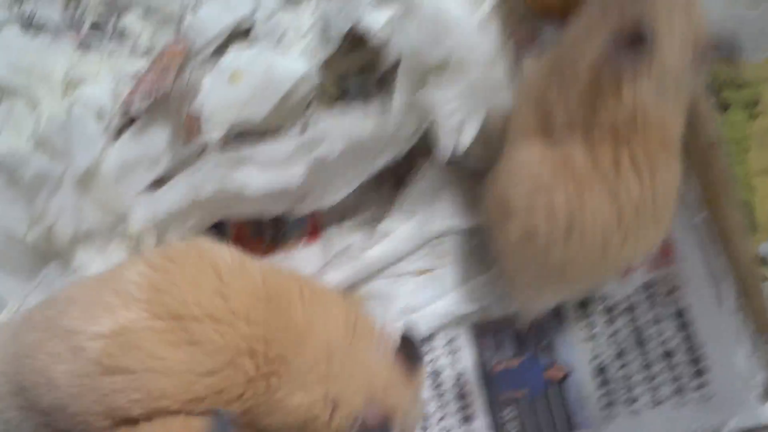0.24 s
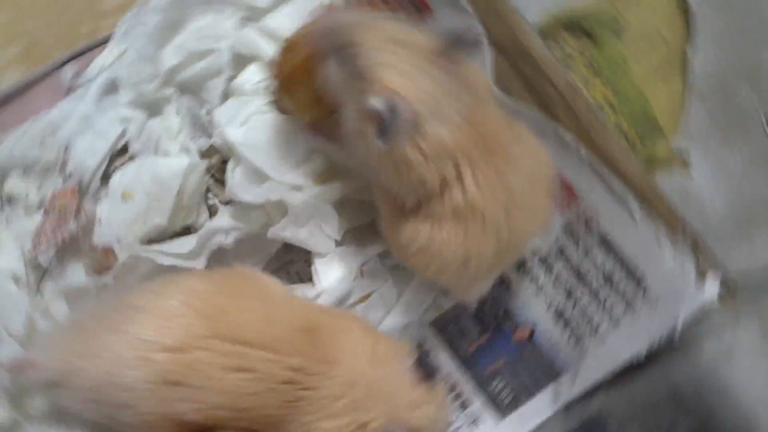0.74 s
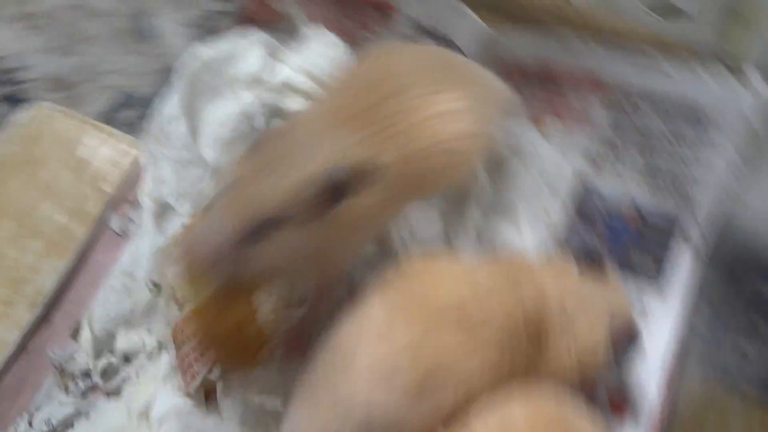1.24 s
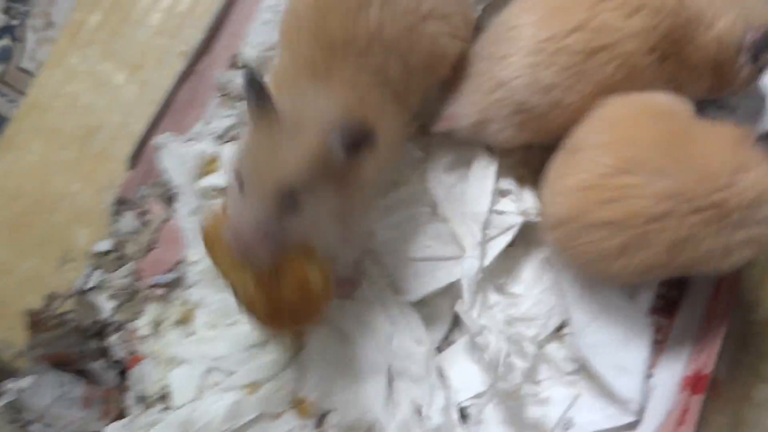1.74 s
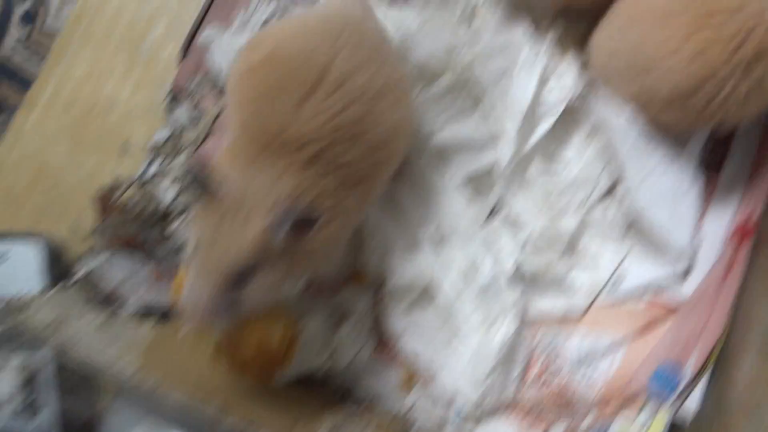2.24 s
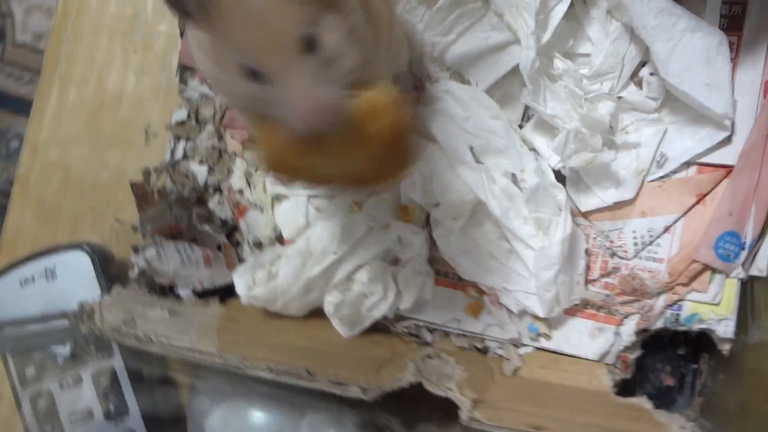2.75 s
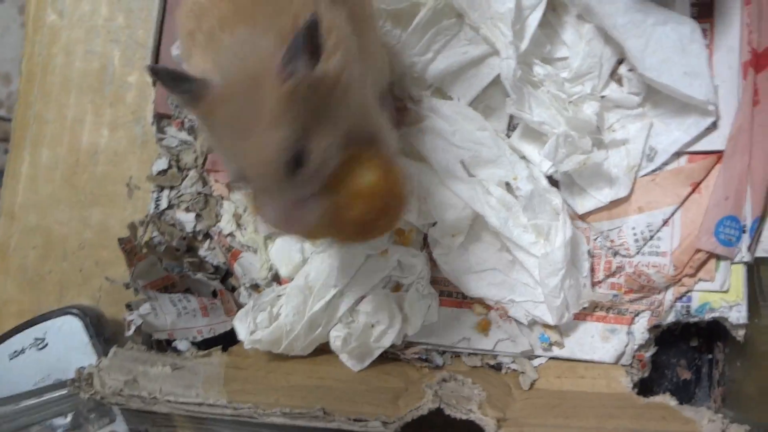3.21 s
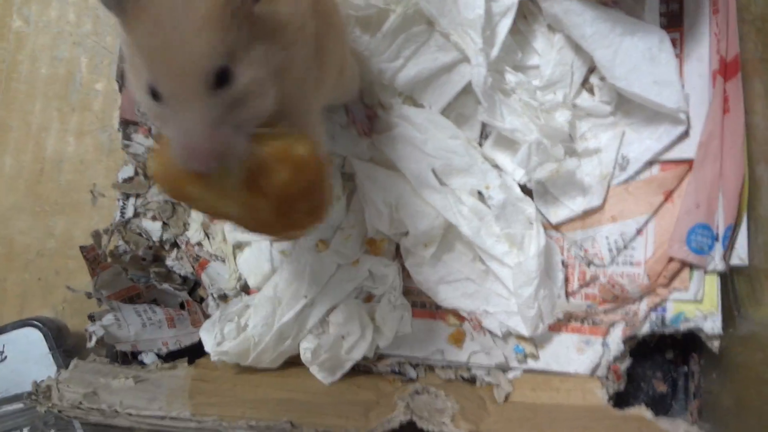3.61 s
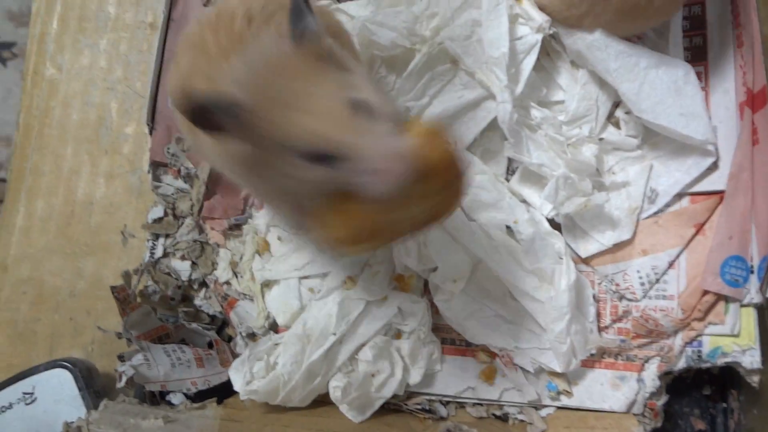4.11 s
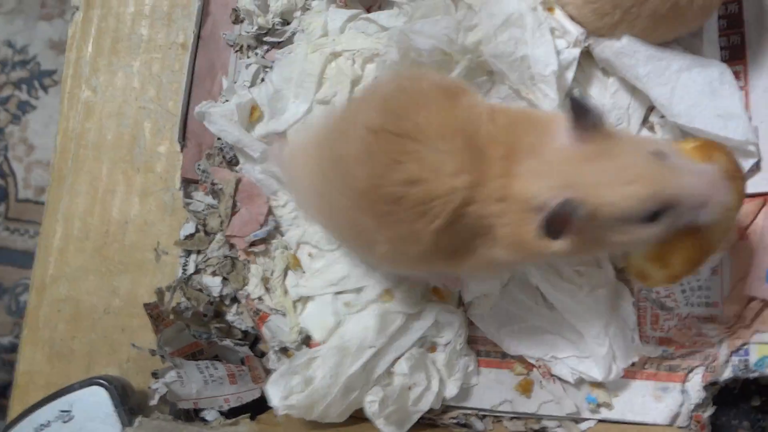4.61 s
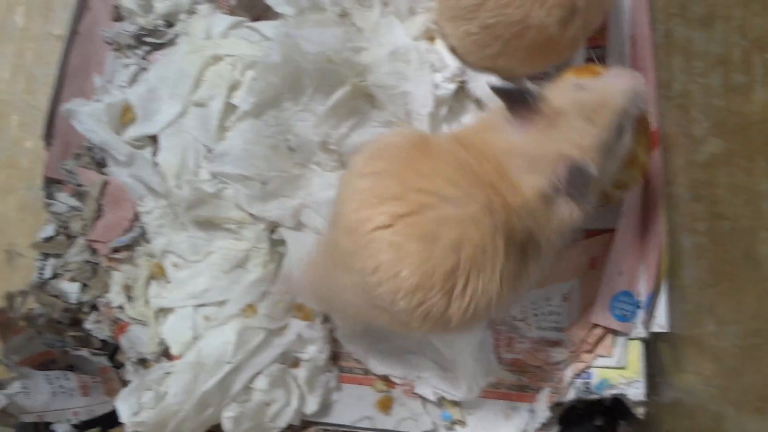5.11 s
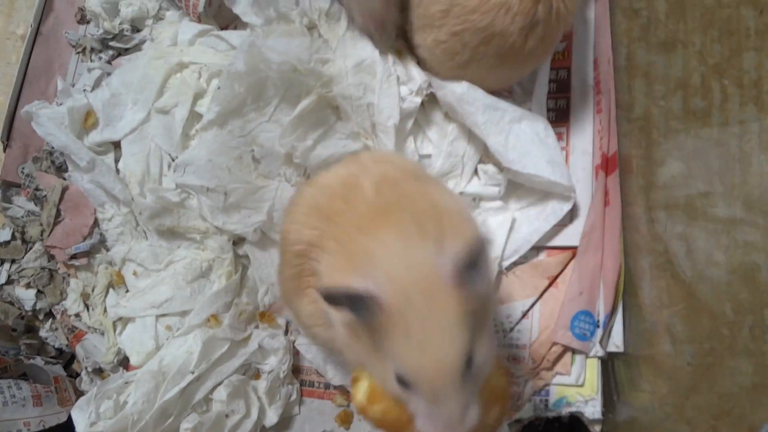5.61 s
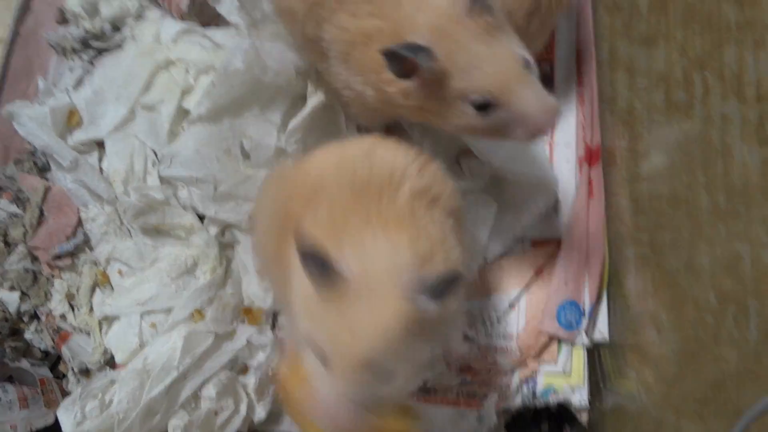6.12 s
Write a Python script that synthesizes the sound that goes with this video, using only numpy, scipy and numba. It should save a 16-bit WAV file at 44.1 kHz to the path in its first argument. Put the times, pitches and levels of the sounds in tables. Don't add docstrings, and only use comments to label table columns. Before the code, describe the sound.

From the start, hamsters scurry close by in crumpled paper: dense dry rustling, with sharp snaps and claw ticks strongest around 0.2 to 0.35 seconds, and soft low paw taps on a hollow wooden floor. Bursts continue near 0.9 and 1.3, then thin out towards 2. At about 2.2 to 2.4 a nut grinds and rolls with a few woody knocks; a tiny sharp tick follows at 2.5. At 2.75 the nut drops: a loud, hollow thump with quick bounces and a brittle rattle, gone by 2.85 except for a low ring. From 3 to 4.2 it is nearly quiet, with faint crinkles and dull steps. Light scurrying returns from 4.3, fuller around 5 to 5.25 with soft low shoves on the board, then scattered rustles until 6.3. Underneath run low rumble, steady hiss, a barely audible high whine and an appliance hum that slowly beats after 2.5. Short, dull room echo.

```python
import sys
import numpy as np
from scipy import signal
from scipy.fft import rfft, irfft, next_fast_len
from scipy.io import wavfile
from scipy.ndimage import uniform_filter1d
from numba import njit

SR = 44100
rng = np.random.default_rng(int(sys.argv[2]) if len(sys.argv) > 2 else 0)


def digitize_waveform(pressure):
    field = np.atleast_2d(pressure).T
    bounded = np.clip(field, -1, 1)
    quanta = np.round(bounded * 32767).astype(np.int16)
    wavfile.write(sys.argv[1], SR, quanta)


def linear_from_db(decibels):
    return 10 ** (np.asarray(decibels, float) / 20)


N = 280343
HUSH = rng.standard_normal(N)

# time in seconds, level in dB.
BUSTLE = [(0.0, -43.5), (0.5, -50), (.9, -49.5), (1.3, -49), (1.65, -51), (1.8, -54), (1.95, -56),
          (2.15, -56.5), (2.7, -59), (3.5, -65), (4.3, -60.5), (4.7, -62), (5.1, -58), (5.4, -63),
          (5.6, -67), (5.9, -59), (6.36, -69)]
# start in seconds, length in seconds, rustle in dB, tissue brightness in dB.
BOUTS = [(0.0, 0.13, -43.5, 2.5), (0.176, 0.013, -45.5, 3.5), (0.218, 0.055, -37.5, -4.5),
         (0.282, 0.045, -39.5, -0.5), (0.373, 0.043, -46, -5), (0.448, 0.018, -49, -3),
         (0.506, 0.059, -48, -4), (0.775, 0.25, -56, 3), (0.87, 0.043, -51.5, -4), (1.075, 0.027, -62, 5.5),
         (1.125, 0.03, -57, 5), (0.908, 0.015, -49, 3.5), (0.955, 0.041, -58, 5), (1.244, 0.063, -51, 6),
         (1.294, 0.032, -41.5, -3), (1.352, 0.097, -46, -0.5), (1.469, 0.076, -50, -1),
         (1.579, 0.045, -46, -4), (1.65, 0.12, -53.5, -3.5), (1.769, 0.091, -48.5, -2.5),
         (1.887, 0.094, -53.5, -2.5), (2.038, 0.44, -52.5, -1.5), (2.363, 0.037, -46, -7.5),
         (2.491, 0.091, -57, 2.5), (2.838, 0.072, -57.5, -2.5), (3.437, .04, -64.5, 8.5),
         (3.497, 0.043, -63, 6), (3.576, 0.12, -75.5, 15.5), (3.276, 0.055, -66, 4.5), (3.11, .04, -69, -1),
         (3.17, .09, -69.5, 1), (3.845, .04, -71, 6), (4.098, 0.21, -66.5, 2.5), (2.607, 0.11, -67, 4),
         (6.213, 0.072, -58.5, -3), (5.97, 0.037, -62, 1), (3.908, 0.081, -65, 12.5),
         (3.991, 0.051, -61.5, 2), (4.345, 0.25, -56.5, -1), (4.493, 0.059, -54.5, 2.5),
         (4.598, 0.021, -56.5, 2.5), (4.642, 0.059, -52.5, -1.5), (4.735, 0.037, -55.5, 1.5),
         (4.805, 0.18, -58.5, 1), (4.999, 0.21, -49.5, 0.5), (5.236, 0.16, -55.5, -4),
         (5.439, .11, -55, -1.5), (5.579, 0.17, -63, 0), (5.755, 0.074, -53, -1.5),
         (5.87, 0.088, -52.5, 0.5), (6.015, 0.057, -57, 3), (6.082, 0.11, -51, -1.5),
         (6.316, .06, -49.5, -5.5)]
# time in seconds, level in dB.
PATTER = [(0.0, -50), (.35, -42.5), (.44, -61), (.53, -51.5), (.7, -54.5), (1.25, -56), (1.32, -48),
          (2.1, -52), (2.32, -39.5), (2.5, -49.5), (3.55, -53.5), (3.92, -53.5), (4.33, -58.5),
          (4.4, -49.5), (4.98, -56.5), (5.15, -44.5), (5.9, -52), (6.1, -57.5)]
# pitch in Hz, level in dB, 60 dB decay in seconds.
BOARD_MODES = [(179, 5.5, 0.058), (195, 10.5, 0.091), (245, 7, 0.14), (279.2, 2, 0.23), (351, -13, 0.07)]
# pitch in Hz, density in dB per Hz.
HISS_COLOUR = [(41, -44), (70, -11.5), (217, -5), (286, -1.5), (362, -29), (555, -12),
               (1360, -27), (3500, -28.5), (7400, -32.5), (10000, -30.5), (11000, -37.5)]

# start in seconds, peak in dB, pitch in Hz, hiss share from 0 to 1.
SNAPS = [(0.1315, -33, 3700, 1), (0.2044, -28.5, 1970, 1), (0.2236, -19, 5800, 1), (0.2385, -14, 3180, 0),
         (0.2607, -26, 3440, 0.4), (0.31, -25.5, 2180, 0.6), (0.321, -35, 1830, 1),
         (0.3398, -24.5, 1720, 1), (0.468, -36, 1800, 0.4), (0.5265, -34, 1860, 1),
         (0.5355, -34, 2370, 0.8), (0.6252, -39.5, 2600, 0.1), (0.7764, -35, 1500, 0.2),
         (0.8053, -39, 6460, 0.5), (0.9175, -26, 3570, 0.9), (0.925, -29, 2400, 0.9),
         (0.9331, -27.5, 2370, 0.2), (1.252, -34, 7570, 0.8), (1.3061, -31, 2330, 0.7),
         (1.3304, -27, 7630, 0.7), (1.3931, -28, 5930, 0.8), (1.6134, -31, 1820, 1),
         (1.6939, -37.5, 3740, 0.4), (1.742, -42, 3980, 0.3), (1.848, -30, 5000, 0.9)]
CRINKLES = [(2.4382, -34.5, 3205, 1), (2.7595, -44, 5340, 0), (2.8209, -27.5, 4500, 0.1),
            (2.8805, -39, 5000, 0), (2.8805, -42, 6700, 0), (3.283, -47, 6500, .3), (4.04, -44, 9000, .5),
            (6.108, -35.5, 1580, .6), (6.136, -42, 4940, .6), (2.9196, -42, 3100, 1),
            (3.123, -45.5, 5460, 0.5), (3.2997, -39, 2250, 0.4), (3.325, -40.5, 9100, .5),
            (3.402, -44, 9900, .3), (3.424, -35, 10160, 1), (3.452, -37.5, 10000, 0.4),
            (3.545, -39.5, 7770, .6), (3.86, -45, 3130, 1), (4.14, -45, 3000, 0.9),
            (4.3627, -45, 4700, 0.3), (4.4236, -40.5, 2680, 0.2), (4.52, -37, 2680, 0.3),
            (4.6048, -38, 2570, 1), (4.6315, -38, 6000, .9), (4.7026, -33.5, 4650, 0),
            (4.7875, -35, 3000, 0.46), (5.0129, -41, 3320, 0.5), (5.0352, -38, 4530, 0.3),
            (5.1504, -30, 3270, 0.7), (5.433, -44, 2470, 0), (5.62, -42, 5320, 0.7),
            (5.7727, -51, 2410, 0.7), (6.326, -44, 2550, 0.5)]
# start in seconds, peak in dB, pitch in Hz, decay in seconds, hiss share from 0 to 1.
TICKS = [(.239, -29.5, 622, 0.058, 0.5), (.339, -28.5, 680, 0.017, 0), (2.5245, -20.5, 1800, 0.0022, 0.2),
         (2.5247, -24, 2250, 0.0026, 0), (4.7865, -33.5, 4740, 0.0052, 0.5),
         (4.7865, -27, 9800, 0.0025, 0.9), (4.517, -43, 2630, 0.1, 0.8), (3.427, -45.5, 840, 0.069, 0),
         (3.601, -39.5, 815, 0.023, 0.6), (5.436, -40, 560, 0.037, 0), (5.490, -36.5, 590, 0.017, 0.8),
         (5.609, -43, 785, 0.068, 0.3), (6.273, -36.5, 620, 0.012, 0.76), (6.33, -42.5, 705, 0.041, 0.3)]
# start in seconds, peak in dB, pitch in Hz, decay in seconds.
STEPS = [(0.051, -33, 277.5, 0.079), (0.237, -20.5, 950, 0.02), (0.338, -33, 248, 0.065),
         (0.468, -32.5, 260, 0.041), (0.529, -31.5, 227, 0.056), (1.304, -35, 1056, 0.1),
         (1.846, -37, 186, 0.037), (2.565, -38, 183, 0.082), (3.18, -44, 241, 0.065),
         (3.294, -38.5, 167, 0.078), (3.429, -43, 177, 0.04), (3.601, -34, 190, 0.047),
         (3.905, -39.5, 262, 0.027), (4.14, -39.5, 257, 0.036), (4.617, -31, 220, 0.024),
         (4.673, -32, 206, 0.066), (5.106, -34.5, 210, 0.057), (5.407, -35.5, 204, 0.14),
         (5.434, -38, 248, 0.024), (5.489, -27, 207, 0.03), (5.609, -32.5, 245, 0.057),
         (5.656, -38, 203, 0.035), (5.782, -38.5, 245, 0.096), (6.273, -38.5, 287, 0.07)]
CRACKLES = [(2.7465, -42, 4500, .01), (2.758, -26, 4800, .02), (2.763, -29, 4700, .015),
            (2.758, -32, 2100, .015), (2.779, -38, 5900, .015), (2.7905, -28, 2560, .02),
            (2.7952, -27, 2600, .03), (2.796, -31, 6100, 0.022), (2.803, -32, 2800, .02),
            (2.3, -38, 1600, .004), (2.7, -39, 1700, .008), (0.58, -31, 2400, .01),
            (4.631, -40, 11000, .004), (4.7022, -34, 5000, .006), (5.434, -41, 3000, .012),
            (5.385, -46, 2550, .015), (5.655, -44, 860, .012), (5.70, -47, 800, .012),
            (6.325, -40, 970, .01), (.008, -29, 3200, .01), (.131, -27, 3600, .007),
            (.1312, -29, 7500, .007), (.206, -31, 8000, .006), (.931, -30, 5000, .02),
            (4.6595, -43, 3100, .1)]
PRICKS = [(.193, -28.5, 1100, 0.015), (.312, -22, 800, 0.0093), (.454, -38, 750, .01),
          (.469, -30.5, 890, 0.013), (.526, -30, 2820, 0.0045), (.537, -31, 7100, 0.0034),
          (.728, -42, 3200, .006), (.84, -38, 5530, .006), (.883, -33, 3480, 0.0042),
          (1.086, -36.5, 2000, 0.0074), (1.158, -42, 4000, .008), (1.365, -31, 5500, .008),
          (1.411, -31, 7500, .006), (1.481, -35, 9500, 0.0045), (1.524, -33, 2500, .004),
          (1.695, -43, 4500, 0.0066), (2.388, -30, 2180, .008), (5.151, -35, 1500, 0.0068),
          (.323, -27, 9300, .006), (.29, -31, 1300, .008), (.269, -29, 1500, 0.01),
          (3.848, -46, 8000, .005), (4.566, -42, 8500, .006), (4.606, -38, 8150, .008),
          (4.6315, -31, 3000, 0.0044), (4.787, -31.5, 2700, 0.0064), (4.807, -43, 9500, .005),
          (5.752, -44, 1300, .006), (5.771, -37.5, 1210, .008), (5.911, -37, 1400, .01),
          (6.165, -40, 1200, .01)]
FACETS = [(2.232, -37, 214, .08), (2.29, -35, 192, 0.088), (2.29, -44, 670, .05), (2.333, -34, 700, 0.07),
          (2.357, -30, 335, 0.053), (2.383, -22, 685, 0.038), (2.376, -31, 1170, 0.056),
          (2.389, -27, 364, 0.15), (5.9, -41, 265, 0.071), (5.94, -39, 253, .04), (2.76, -30, 1230, .07),
          (5.1, -44, 320, .08), (2.235, -42, 370, 0.18), (2.32, -45, 387, .06), (2.415, -39, 800, .08),
          (5.19, -46, 650, .03), (5.285, -46, 793, .04), (1.4, -45, 750, .06), (.233, -30.5, 787, 0.012),
          (.345, -33, 290, 0.1), (5.2, -41, 233, 0.034), (4.733, -40, 187, 0.035), (5.5, -44.5, 520, .03),
          (5.152, -33, 266, 0.043), (5.352, -37, 212, 0.062), (5, -47, 250, 0.019),
          (5.818, -38.5, 240, 0.08), (5.062, -46, 860, 0.036), (5.938, -53, 530, 0.023),
          (5.695, -54, 716, 0.026)]
# start in seconds, length in seconds, pitch in Hz, level in dB.
HOLLOWS = [(0.399, 0.32, 930, -55.5), (.5, 0.32, 1375, -58.5), (0.619, 0.45, 1000, -57.5),
           (.98, .22, 1500, -57.5), (1.12, 0.15, 1200, -58), (1.3, .07, 724, -48), (1.36, .22, 1210, -56),
           (1.62, 0.16, 1090, -57), (1.679, 0.34, 1203, -58), (5.33, .08, 1450, -64), (1.5, 0.15, 184, -51),
           (5.1, .3, 95, -56)]

# time in seconds, level in dB.
GRIND = [
    (2.17, -78),
    (2.23, -51),
    (2.29, -50.5),
    (2.34, -46),
    (2.365, -36.5),
    (2.388, -36),
    (2.405, -40),
    (2.44, -71),
    (2.48, -73),
]
# time in seconds, blow in dB, contact in milliseconds.
ROLL = [
    (2.318, -21.5, 2),
    (2.358, -15.5, 1.8),
    (2.368, -26, 1.1),
    (2.379, -27, 0.61),
    (2.388, -27, 1.4),
]
# time in seconds, blow in dB, contact in milliseconds.
DROP = [
    (2.7438, -25, 1.58),
    (2.7529, -12.3, 2.34),
    (2.7591, -3.6, 2.09),
    (2.7628, -14.4, 2.34),
    (2.7687, -16, .44),
    (2.7752, -19.6, .42),
    (2.796, -16.1, 1.3),
]
# time in seconds, level in dB.
RATTLE = [
    (2.741, -64),
    (2.748, -43),
    (2.753, -45),
    (2.760, -35),
    (2.772, -44),
    (2.797, -35.5),
    (2.812, -43),
    (2.835, -72),
    (2.94, -69),
]
# time in seconds, push in dB, contact in milliseconds.
SHOVE = [
    (5.196, -24, 4.7),
    (5.213, -26.5, 3),
    (5.233, -24, 2.5),
    (5.248, -26, 3),
    (5.285, -31, 2),
]
# pitch in Hz, level in dB, 60 dB decay in seconds.
GRIND_MODES = [(367, -5.5, 0.08), (690, -6, 0.06), (813, -7.5, 0.05), (890, -14, 0.055), (1193, -7, 0.037)]
ROLL_MODES = [(202, -5, 0.34), (305, -5.5, 0.062), (348, -14, 0.1), (696, -16, 0.052), (780, -32, 0.092),
              (1180, -3.5, 0.12)]
DROP_MODES = [(91.92, -11.1, 1.05), (179.7, -13.5, .09), (198.9, -20.5, .35), (246.6, 0, .171),
              (271.3, -7.9, .139), (325.9, -2.9, .021), (362.7, -21.2, .24), (602, -15, 0.07),
              (788, -17, .09), (1225, -24, 0.08)]
RATTLE_MODES = [(803, 6, 0.018), (1210, -28, .05), (1800, -13, 0.037), (2137, -9, 0.1), (2630, -3, 0.042),
                (3130, -4, 0.022), (3350, -4, 0.023), (4200, -13, 0.0098), (4650, 1, 0.0069),
                (5230, 1, 0.0082), (5780, -1, 0.011), (6230, -4, 0.01), (8500, -14, 0.0071),
                (9100, -5, 0.0039)]
SHOVE_MODES = [(204, 0, 0.14), (257, -7, 0.083), (321, -8, 0.059)]

HUM_HZ, HUM_DB = 122.2, -59
SECOND_MOTOR_S, BEAT_HZ, BEAT_NULL_S = 2.5, 0.846, 3.74
RUMBLE_DB, RUMBLE_FOLLOWS = -57, 0.49
HISS_DB = -54
WHINE_HZ, WHINE_WIDTH_HZ, WHINE_DB, WHINE_WAVER_DB = 9160, 53, -82, 5
BOUT_ATTACK_S, BOUT_ATTACK_SHARE = 0.0062, 0.1
BOUT_SAG_DB_PER_S, BOUT_RELEASE_DB_PER_S = 8.5, 205
IDLE_RUSTLE_DB, IDLE_BRIGHT_DB, SHEET_IN_BOUT_DB = -11, -11.5, -4.5
SNAP_T60_S, CRINKLE_T60_S, STEP_HISS = 0.019, 0.021, 0.082
SPLASH_S = 0.024
HOLLOW_WIDTH_HZ, HOLLOW_FLUTTER_DB = 15, 2
ROOM_T60_S, ROOM_DB = 0.22, -12.5
TOP_HZ = 10950


def unit(x):
    return x / np.sqrt(np.mean(x ** 2))


def level_curve(table):
    s, db = np.transpose(table)
    return np.interp(np.arange(N) / SR, s, db)


def decay(t, t60):
    return np.exp(-np.log(1000) * t / t60)


def band(x, lo_hz, hi_hz, order=2):
    sos = signal.butter(order, [lo_hz, hi_hz], "band", fs=SR, output="sos")
    return signal.sosfilt(sos, x + 1e-18 * HUSH[:x.shape[-1]])


def ring(x, hz, t60):
    pole = np.exp(2j * np.pi * hz / SR) * decay(1 / SR, t60)
    return signal.lfilter([0, pole.imag], [1, -2 * pole.real, abs(pole) ** 2], x)


def clicks(rate, spread_db, size=N):
    when, strength, sign = rng.random((3, size))
    return (when < rate / SR) * linear_from_db(-spread_db * np.log(strength + 1e-4)) * np.sign(sign - 0.5)


def walk(rate):
    k = int(SR / rate)
    held = np.repeat(rng.standard_normal(N // k + 1), k)
    return 0.87 * uniform_filter1d(uniform_filter1d(held, k), k)[:N]


def pan(x, db):
    return x * linear_from_db(np.array([[db], [-db]]) / 2)


def spread(mid, side):
    return mid + side * np.array([[1], [-1]])


def placed(x, s):
    return np.pad(x, (int(s * SR), N))[:N]


def room(x):
    t = np.arange(int(0.4 * SR)) / SR
    tail = rng.standard_normal((2, len(t))) * decay(t, ROOM_T60_S) * (t > 0.003)
    tail = band(tail, 330, 10600)
    tail = tail / np.sqrt((tail ** 2).sum(1, keepdims=True))
    return linear_from_db(ROOM_DB) * signal.fftconvolve(x, tail, axes=1)[:, :N]


def hum_and_rumble():
    t = np.arange(N) / SR
    phase = 2 * np.pi * np.cumsum(HUM_HZ + 1.52 * walk(8.1)) / SR
    second_gain = np.clip((t - SECOND_MOTOR_S) / 0.34, 0, 0.85)
    second = second_gain * np.sin(phase + 2 * np.pi * BEAT_HZ * (t - BEAT_NULL_S))
    hum = np.sqrt(2) * (np.sin(phase) - second) * linear_from_db(HUM_DB + 0.68 * walk(2.94))
    both, apart = unit(band(rng.standard_normal((2, N)), 24, 52))
    rumble_db = RUMBLE_DB + RUMBLE_FOLLOWS * (level_curve(BUSTLE) - BUSTLE[0][1])
    return pan(hum + spread(both, 0.13 * apart) * linear_from_db(rumble_db), 0.73)


def hiss():
    hz, db = np.transpose(HISS_COLOUR)
    size = next_fast_len(N)
    colour = linear_from_db(np.interp(np.log(np.fft.rfftfreq(size, 1 / SR) + 1), np.log(hz), db))
    mid, side = (irfft(rfft(rng.standard_normal(size)) * colour, size)[:N] for _ in range(2))
    side = 0.5 * band(side, 350, 5500, order=1) + 0.43 * side
    return unit(spread(mid, side)) * linear_from_db(HISS_DB)


def whine():
    noise = band(rng.standard_normal(N), WHINE_HZ - WHINE_WIDTH_HZ, WHINE_HZ + WHINE_WIDTH_HZ, order=1)
    return unit(noise) * linear_from_db(WHINE_DB + WHINE_WAVER_DB * walk(8.1))


def bouts():
    power = np.zeros((2, N))
    for s, length, db, bright_db in BOUTS:
        i = int(s * SR)
        t = np.arange(min(SR // 2, N - i)) / SR
        attack = np.minimum(t / (BOUT_ATTACK_S + BOUT_ATTACK_SHARE * length), 1)
        db = db - BOUT_SAG_DB_PER_S * t - BOUT_RELEASE_DB_PER_S * np.maximum(t - length, 0)
        power[:, i:i + SR // 2] += (attack * linear_from_db(db + np.array([[0], [bright_db]]))) ** 2
    return np.sqrt(power)


@njit
def grains(start, stop, turn, fade, first, out):
    out = out.copy()
    for k in range(len(start)):
        old, new = 0., first[k]
        for i in range(start[k], stop[k]):
            out[i] += new
            old, new = new, turn[k] * new - fade[k] * old
    return out


def swarm(lo_hz, hi_hz, rate, spread_db, cycles):
    when, place, size, ringing, pocket = rng.random((int(rate * N / SR), 5)).T
    pockets = rng.random((3, 200))
    centre = pockets[(pocket * 3).astype(int), (when * 150 + pocket * 3).astype(int)]
    place = np.where(ringing > 0.5, centre + 0.011 * (place - 0.5), place)
    hz = lo_hz * (hi_hz / lo_hz) ** place
    samples = cycles * (0.29 + ringing) / hz * SR
    radius, angle = decay(1, samples), 2 * np.pi * hz / SR
    start = (when * N).astype(np.int64)
    stop = np.minimum(start + samples.astype(np.int64), N)
    first = linear_from_db(-spread_db * np.log(size + 0.027)) * np.sin(angle)
    snaps = grains(start, stop, 2 * radius * np.cos(angle), radius ** 2, first, np.zeros(N))
    return unit(snaps + 0.6 * snaps[::-1])


def paper():
    idle = linear_from_db(level_curve(BUSTLE) + 1.5 * walk(6.77))
    plain_bout, bright_bout = bouts()
    paw = linear_from_db(1.7 * walk(45))
    plain = np.hypot(plain_bout, idle * linear_from_db(IDLE_RUSTLE_DB))
    bright = np.hypot(bright_bout, idle * linear_from_db(IDLE_BRIGHT_DB))
    sheet = np.hypot(plain_bout * linear_from_db(SHEET_IN_BOUT_DB), idle)
    folds = signal.lfilter([1], [1, -0.97], np.abs(clicks(120, 3))) * rng.standard_normal(N)
    # low and high edge in Hz, gain, level in dB, side level in dB, creases per second, cycles.
    layers = ((1582, 3180, plain * paw, -8, -4.5, 1200, 46),
              (3000, 6460, plain ** 0.7 * bright ** 0.3 * paw, -5, -6, 1400, 11.5),
              (5894, 15000, bright * paw, -4.5, -6, 2200, 77),
              (655.5, 1626, sheet, -7.2, -1.5, 920, 42))
    out = 0
    for lo_hz, hi_hz, gain, db, apart_db, rate, cycles in layers:
        mid, side = unit(band(rng.standard_normal((2, N)), lo_hz, hi_hz)) * linear_from_db(3 * walk(30))
        mid = mid + swarm(lo_hz, min(hi_hz, 11500), rate, 5.55, cycles)
        mid = mid + linear_from_db(-12.5) * unit(band(folds, lo_hz, hi_hz))
        out = out + gain * linear_from_db(db) * spread(mid, linear_from_db(apart_db) * side)
    return pan(out, -0.17)


def patter():
    taps = band(clicks(500, 2.24), 118, 383, order=1)
    board = sum(linear_from_db(db) * ring(taps, hz, t60) for hz, db, t60 in BOARD_MODES)
    return pan(unit(board) * linear_from_db(level_curve(PATTER)), 0.88)


def bursts(table, width, tone, rise_s, pan_db):
    out, t = np.zeros(N + 6000), np.arange(6000) / SR
    for row, noise in zip(table, rng.standard_normal((len(table), 6000))):
        s, db, hz, t60, hiss_share = row
        fade = decay(t, t60) * (1 - np.exp(-t / rise_s)) ** 2
        near = unit(band(noise, hz / (1 + width), hz * (1 + width), order=1))
        splash = hiss_share * noise * np.exp(-t / SPLASH_S)
        x = fade * (tone * np.sin(2 * np.pi * hz * t) + near + splash)
        i = int(s * SR)
        out[i:i + 6000] += x * linear_from_db(db) / np.abs(x).max()
    return pan(out[:N], pan_db)


def crackles():
    return bursts([(*row, 0.2) for row in CRACKLES], 0.2, 1.4, 0.0008, -1.5)


def steps():
    return bursts([(*row, STEP_HISS) for row in STEPS], 0.05, 1.5, 0.0031, 0.36)


def creases():
    snaps = [(s, db, hz, SNAP_T60_S, hiss_share) for s, db, hz, hiss_share in SNAPS]
    crinkles = [(s, db, hz, CRINKLE_T60_S, hiss_share) for s, db, hz, hiss_share in CRINKLES]
    return bursts(snaps + crinkles, 0.66, 1, 0.00086, -0.65)


def knocks_and_pricks():
    facets = bursts([(*row, 0.02) for row in FACETS], 0.066, 2.9, 0.0044, 1)
    return facets + bursts([(*row, 0.8) for row in PRICKS], 0.61, 0.97, 0.00067, -0.6)


def claw_ticks():
    return bursts(TICKS, 0.53, 4.2, 0.00081, -2.3)


def hollows():
    out, t = np.zeros(N), np.arange(SR // 2) / SR
    for (s, length, hz, db), noise in zip(HOLLOWS, rng.standard_normal((len(HOLLOWS), SR // 2))):
        swell = np.sin(np.pi * np.clip(t / length, 0, 1)) ** 0.5
        tone = unit(band(noise, hz - HOLLOW_WIDTH_HZ, hz + HOLLOW_WIDTH_HZ, order=1))
        i = int(s * SR)
        out[i:i + SR // 2] += linear_from_db(db) * swell * tone
    return out * linear_from_db(HOLLOW_FLUTTER_DB * walk(25))


def scrape(curve, modes, rate, grit_db):
    s, level_db = np.transpose(curve)
    catches = clicks(rate, 2.8, size=SR // 2)
    gain = linear_from_db(np.interp(s[0] + np.arange(SR // 2) / SR, s, level_db, right=-120))
    body = 0
    for hz, db, t60 in modes:
        body = body + linear_from_db(db) * ring(band(catches, hz / 1.07, hz * 1.02, order=1), hz, t60)
    grit = unit(band(catches, modes[0][0], max(0.65 * modes[-1][0], 3500)))
    return placed((unit(body) + linear_from_db(grit_db) * grit) * gain, s[0])


def knocks(blows, modes):
    force, first = np.zeros(SR + SR // 2), blows[0][0]
    for s, db, ms in blows:
        i = int((s - first) * SR)
        push = np.sin(np.pi * np.clip(np.arange(200) / SR * 1000 / ms, 0, 1)) ** 2
        force[i:i + 200] += linear_from_db(db) * push / push.sum()
    out = 0
    for hz, db, t60 in modes:
        out = out + linear_from_db(db) * ring(band(force, hz / 1.027, hz * 1.29, order=1), hz, t60)
    return placed(out, first)


def nut_and_board():
    board = scrape(GRIND, GRIND_MODES, 1210, -19) + knocks(ROLL, ROLL_MODES)
    board = board - knocks(DROP, DROP_MODES) + knocks(SHOVE, SHOVE_MODES)
    return pan(board, 1.1) + pan(scrape(RATTLE, RATTLE_MODES, 6000, -2.8), -4.5)


def scene():
    background = hum_and_rumble() + hiss() + whine()
    soft = paper() + patter() + crackles() + hollows()
    sharp = steps() + creases() + claw_ticks() + nut_and_board()
    near = knocks_and_pricks()
    return background + soft + sharp + room(sharp) + near + room(near)


def top_cut(x):
    return signal.sosfilt(signal.butter(12, 12360, fs=SR, output="sos"), x)


def record(dry):
    steep = signal.ellip(10, 0.3, 75, TOP_HZ, fs=SR, output="sos")
    mix = signal.sosfilt(steep, dry)
    return top_cut(mix)


dry = scene()
out = record(dry)
digitize_waveform(out)
```